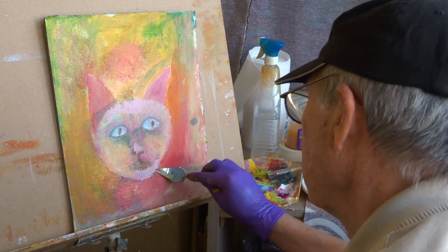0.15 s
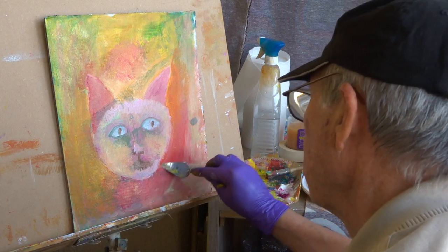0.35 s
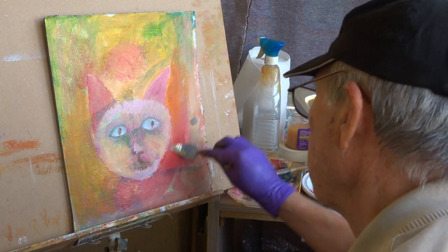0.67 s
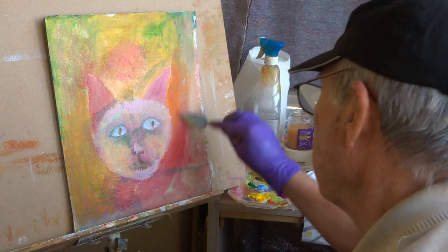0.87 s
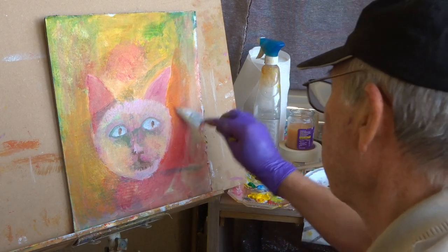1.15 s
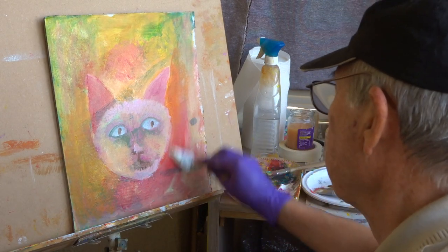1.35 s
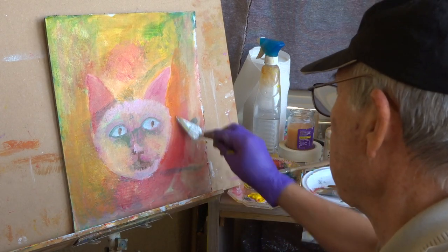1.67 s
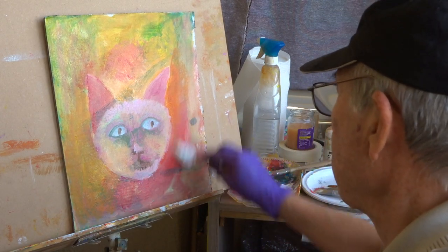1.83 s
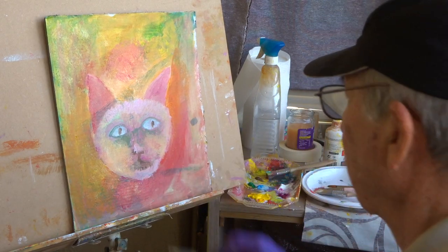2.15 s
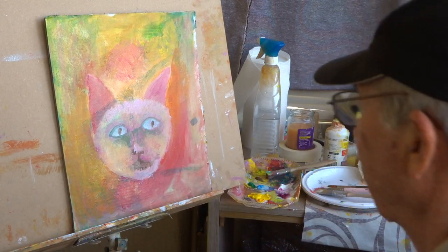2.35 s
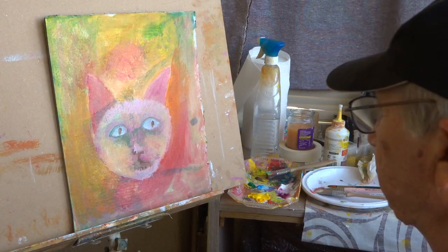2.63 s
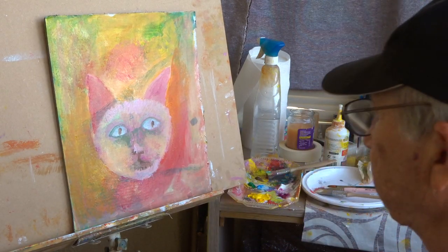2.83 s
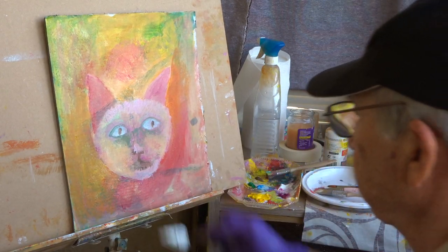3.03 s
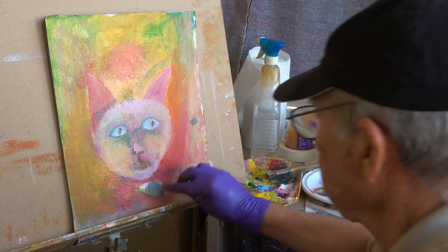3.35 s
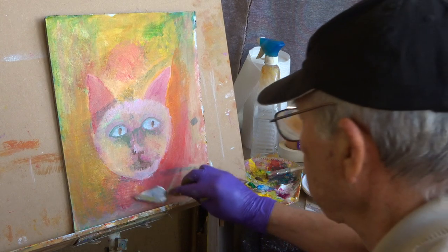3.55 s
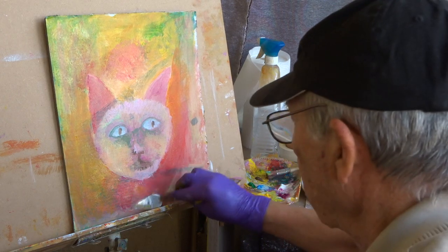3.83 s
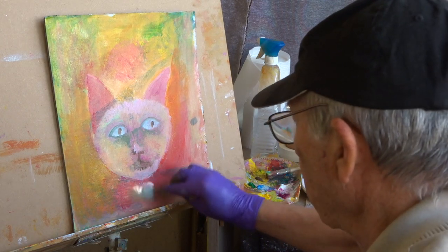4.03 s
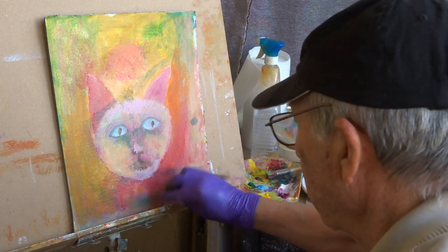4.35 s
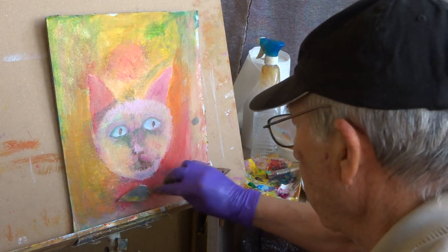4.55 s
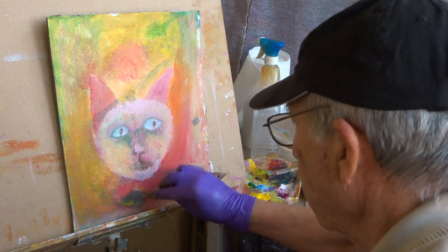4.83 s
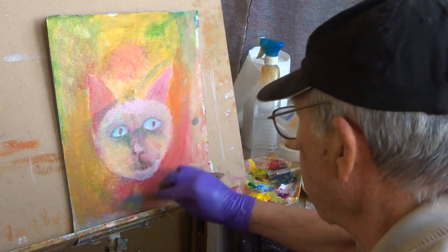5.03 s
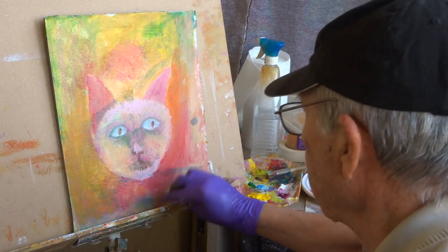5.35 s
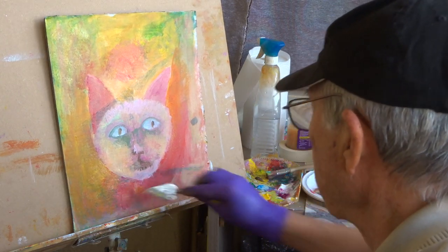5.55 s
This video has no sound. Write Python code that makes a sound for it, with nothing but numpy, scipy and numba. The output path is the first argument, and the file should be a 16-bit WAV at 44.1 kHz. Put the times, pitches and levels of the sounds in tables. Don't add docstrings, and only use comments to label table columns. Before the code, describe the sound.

A thin steel painting knife works on a board close to a stereo microphone in a small furnished room. Faint smears come first, then two louder rasping strokes with springy metallic ring, a near-quiet pause with tiny sticky ticks, and finally an irregular run of light scrapes and increasingly sharp taps. A soft fan hum continues underneath.

```python
import sys
import numpy as np
from scipy import signal
from scipy.fft import rfft, irfft, next_fast_len
from scipy.io import wavfile
from numba import njit

SR = 44100
rng = np.random.default_rng(int(sys.argv[2]) if len(sys.argv) > 2 else 0)


def boost_factor(decibels):
    exponent = np.asarray(decibels, float) / 20
    return 10 ** exponent


def unload_audio(sound):
    columns = np.transpose(np.atleast_2d(sound))
    steps = np.round(np.clip(columns, -1, 1) * 32767)
    wavfile.write(sys.argv[1], SR, steps.astype(np.int16))


N = 250929

# (frequency [Hz], density [dB per Hz])
HUM_MID = [(25, -31), (75, -31), (110, -18), (185, -14), (225, -5), (520, -4.5), (800, 2), (1130, -0.5),
           (1300, -8.5), (1550, -11.5), (2500, -16.5), (3500, -19), (3900, -23.5), (11500, -29.5)]
# (frequency [Hz], density [dB per Hz])
HUM_SIDE = [(15, -84.5), (25, -58), (216, -28), (279, -21.5), (420, -22), (466, -13.5), (543, -23),
            (907, -4.5), (1370, -20.5), (1860, -22.5), (2010, -24), (2400, -25.5), (4570, -35),
            (10600, -43.5), (11500, -44), (15000, -86), (22000, -120)]
# (frequency [Hz], width [Hz], level [dB], not used)
HUM_PEAKS = [(584, 114, -3), (1046, 206, 0)]

# (time [s], upper modes [dB], second mode [Hz])
SMEARS = [
    [(.3, -79, 1960), (.39, -55, 2020), (.43, -55, 1980), (.47, -62.5, 1990), (.51, -77, 2000)],
    [(.55, -59.5, 1990), (.64, -53.5, 2060), (.67, -59, 2010), (.72, -49.5, 2030), (.745, -43.5, 1990),
     (.8, -43, 1990), (.84, -55.5, 1900), (.905, -42.5, 1973), (.96, -81, 1980)],
]
# (time [s], upper modes [dB], second mode [Hz])
STROKES = [
    [(1.235, -52, 2000), (1.275, -59, 1980), (1.296, -47.5, 2166), (1.319, -36.5, 2140),
     (1.38, -34.5, 2050), (1.4, -28, 1990), (1.421, -23.5, 2030), (1.44, -52, 2030), (1.5, -50, 2050)],
    [(1.8, -50.5, 1990), (1.832, -45.5, 2160), (1.85, -29, 2090), (1.872, -23.5, 2055), (1.935, -22, 1990),
     (1.948, -49, 1900), (1.99, -63, 1830), (2.065, -58, 1950), (2.12, -60, 1950)],
]
# (level at FIRM_DB [dB], change with level [dB per dB], change with bend [dB per 100 Hz])
SMEAR_MIX = [(-5.5, -0.19, -2.5), (-9, -0.33, 0), (2.5, 0.46, -4.1)]
STROKE_MIX = [(-1, -0.033, 3.3), (-12, -0.28, 11.8), (-0.5, -0.12, 4.6)]
FIRM_DB = -35.5
REST_HZ = 2020
# (frequency [Hz], width [Hz], level [dB])
BLADE_LIGHT = [(1178, 23, 0), (1513, 34, -19), (1990, 59, -3), (2670, 41, -16), (3200, 46, 6.5),
               (3600, 64, -15), (4130, 82, -6.5), (4210, 140, -9), (5080, 78, -12), (5130, 140, -18),
               (6100, 88, -15), (7570, 110, -11.5)]
# (frequency [Hz], width [Hz], level [dB])
BLADE_FLAT = [(1225, 95, 0), (1457.4, 137, -9.5), (1950, 142, 2), (2030, 118, 5), (2250, 65, -13),
              (2740, 47, -5), (3000, 61, 0), (3224, 62, 4.5), (3210, 48, -18), (4070, 57, -32),
              (4320, 92, -5.5), (4550, 140, -9), (6000, 190, -20), (6800, 68, -36)]
# (frequency [Hz], width [Hz], level [dB])
BLADE_EDGE = [(1130, 22, 0), (1930, 165, 0.5), (2330, 41, -2), (2786, 260, 13), (3170, 24, 22.5),
              (3400, 170, 11.5), (4600, 28, -1), (4720, 48, 8.5), (6300, 20, -73), (6600, 120, -21)]
# (frequency [Hz], density [dB per Hz])
GRIT = [(300, -49), (700, -92), (1300, -10), (2500, -3), (3700, -9.5), (6000, -4), (8000, -9),
        (10500, -13.5), (13000, 4)]

# (frequency [Hz], T60 [s])
ROOM_T60 = [(300, 0.62), (1000, 0.23), (3000, 0.26), (7000, 0.27), (11000, 0.25)]
# (frequency [Hz], side over mid [dB])
ROOM_SIDE = [(300, -10), (900, -7), (2500, -12), (6000, -9), (11000, -8.5)]
# (delay [s], level [dB])
ECHOES = [(.0046, -1), (.0066, -11.5), (.0092, -30)]

# (time [s], peak [dB], upper modes over peak [dB])
LANDINGS = [
    (0.4163, -61, -1),
    (1.215, -38, -21),
    (1.737, -37, -12.5),
    (1.8017, -44.5, -12),
]
# (frequency [Hz], level [dB], T60 [s])
BLADE_FREE = [(1122, 2.5, 0.11), (1880, -1.5, 0.067), (1876, 7, 0.034), (3200, -1.5, 0.053),
              (3390, -28, .05), (4090, -5, 0.037), (5370, -22, 0.041), (6200, -12, .05), (6870, -5, .04),
              (7730, -24, .04)]
# (time [s], peak [dB], blade ring [Hz], crack over peak [dB])
TICKS = [(0.416, -45.5, 4210, 6.5), (1.368, -26, 4600, -12), (1.7362, -35, 3000, -7),
         (2.069, -46.5, 4630, -4), (2.3865, -53, 4150, 8), (2.4253, -41, 3630, -4),
         (2.437, -40.5, 3720, -2.5), (2.8099, -48.5, 3160, -10), (3.6652, -45.5, 3280, -8),
         (3.8234, -40.5, 3550, 2.5), (4.148, -37.5, 4000, 2), (4.3778, -53, 3260, 3.5),
         (4.675, -37.5, 3600, -8), (4.9401, -33, 3800, -3.5), (5.053, -40.5, 4560, -17),
         (5.405, -38.5, 4750, -14), (5.4717, -44.5, 3310, 3.5)]
# (time [s], peak [dB], blade ring [Hz], board knock [Hz], knock over peak [dB])
TAPS = [(0.8375, -33.5, 4260, 1820, -4.5), (1.242, -35, 3160, 1880, -8.5), (1.2482, -56, 2500, 2480, -1),
        (3.3729, -46, 3530, 1220, -9), (3.578, -39, 3120, 2350, -18), (3.695, -44, 2840, 1250, -7),
        (3.879, -32, 4600, 2270, -5.5), (3.8856, -28, 3130, 2540, -17), (4.012, -35.5, 2970, 1930, -35),
        (4.4295, -25.5, 4000, 1240, -6.5), (4.64, -34.5, 3240, 1950, -33), (4.718, -19, 3400, 2230, -7.5),
        (4.9585, -19.5, 3310, 2400, -15), (5.1656, -29.5, 3200, 1930, -31), (5.212, -26.5, 3360, 1670, -6),
        (5.419, -20.5, 3170, 1800, -5.5), (5.4874, -29, 3370, 1850, -13)]
# (firmest contact [s], slide-in [s], ring [dB], dry hiss over ring [dB])
DABS = [(2.31, .02, -68, 17), (2.39, 0.065, -65.5, 17), (2.43, .03, -69, -1), (2.5, .05, -66, 16),
        (2.815, .01, -58.5, 9.5), (3.41, 0.061, -55, -36), (3.46, 0.032, -49, 7), (3.51, .06, -55, -3),
        (3.6, 0.093, -61, 8), (3.68, 0.037, -55.5, -16), (3.79, 0.027, -51, 4), (3.86, 0.064, -43.5, -1),
        (3.9, .02, -59, -2.5), (4.035, .015, -56, -11), (4.13, 0.22, -54, 4), (4.17, .02, -51.5, -14),
        (4.416, 0.069, -49, 6.5), (4.45, .02, -43.5, -14), (4.51, .01, -44.5, 0), (4.66, 0.023, -51, 1),
        (4.707, 0.072, -46.5, 3), (4.75, .02, -44.5, -8), (4.828, 0.025, -44.5, 1),
        (4.952, 0.038, -38.5, 4.5), (4.99, 0.018, -54, -17), (5.06, 0.037, -51, 5), (5.192, .02, -38, 0),
        (5.24, .02, -52, -15), (5.3, 0.031, -46, -4), (5.495, 0.026, -57, -3)]


def rms_one(x):
    return x / np.sqrt(np.mean(x ** 2) + 1e-20)


def at_hz(points, hz):
    table_hz, values = np.array(points)[:, 0], np.array(points)[:, 1]
    return np.interp(np.log(np.maximum(hz, 1)), np.log(table_hz), values)


def colour(x, spectrum):
    size = next_fast_len(N)
    gain = boost_factor(at_hz(spectrum, np.fft.rfftfreq(size, 1 / SR)))
    return rms_one(irfft(rfft(x, size) * gain, size)[:N])


def band(x, low_hz, high_hz):
    return signal.sosfilt(signal.butter(2, [low_hz, high_hz], "band", fs=SR, output="sos"), x)


def band_one(x, low_hz, high_hz):
    return x / np.sqrt(np.mean(band(x, low_hz, high_hz) ** 2))


def drift(rate_hz):
    r = np.exp(-2 * np.pi * rate_hz / SR)
    slow = signal.lfilter([1], [1, -2 * r, r * r], rng.standard_normal(N + SR))
    return rms_one(slow[SR:])


@njit
def ring(force, turn, bend, r):
    out, state = np.zeros(len(force)), 0j
    for i in range(len(force)):
        state = state * r * np.exp(1j * turn * bend[i]) + force[i]
        out[i] = state.imag
    return out


def resonate(force, modes, bend, widen, wander_db):
    rows = []
    for k, (hz, width_hz, level_db) in enumerate(modes):
        r = np.exp(-np.pi * width_hz * widen / SR)
        strength = boost_factor(level_db + wander_db * drift(13.8))
        drive = force * strength * (1 - r) * (-1) ** k
        shift = bend if hz < 2500 else np.sqrt(bend)
        rows.append(ring(drive, 2 * np.pi * hz / SR, shift, r))
    return np.array(rows)


def fan_hum():
    mid_db, side_db = -51.5, -54
    mid = colour(rng.standard_normal(N), HUM_MID)
    side = colour(rng.standard_normal(N), HUM_SIDE)
    peaks = [(hz, width_hz, 0) for hz, width_hz, _ in HUM_PEAKS]
    mid = rms_one(mid + 1.2 * sum(resonate(mid, peaks, np.ones(N), widen=1.0, wander_db=0)))
    side = boost_factor(side_db) * side - 0.65 * boost_factor(mid_db) * band(mid, 770, 1900)
    mid = boost_factor(mid_db) * mid
    return boost_factor(0.048 * drift(21)) * np.array([mid + side, mid - side])


def contact(tables, mix):
    rows = []
    for table in tables:
        before = (table[0][0] - .006, -95, table[0][2])
        after = (table[-1][0] + .006, -95, table[-1][2])
        rows += [before, *table, after]
    s, *columns = np.transpose(rows)
    level_db, hz = [np.interp(np.arange(N) / SR, s, c) for c in columns]
    firmness_db, bend = level_db - FIRM_DB, (hz - REST_HZ) / 100
    over_db = [base + per_db * firmness_db + per_bend * bend for base, per_db, per_bend in mix]
    return level_db, *over_db, hz


def grit_clicks(per_s, spread_db, lumpy_db):
    sizes = boost_factor(spread_db * np.minimum(rng.exponential(1, N), 5)) * rng.choice([-1, 1], N)
    hits = rng.random(N) < per_s / SR
    return rms_one(sizes * hits * boost_factor(lumpy_db * drift(81)))


def scrape(upper_db, hiss_db, first_db, second_db, modes, bend, per_s, widen, ring_trim_db, hiss_trim_db):
    clicks = grit_clicks(per_s, spread_db=1.5, lumpy_db=2.7)
    rows = resonate(clicks, modes, bend, widen, wander_db=4.0)
    hz = np.array(modes)[:, 0]
    first = rms_one(rows[0])
    second = rms_one(sum(rows[(hz > 1450) & (hz < 2500)]))
    upper = band_one(sum(rows[hz > 2500]), 2600, 4500)
    rung = upper + boost_factor(first_db) * first + boost_factor(second_db) * second
    hiss = band_one(colour(clicks, GRIT), 5000, 11000)
    return boost_factor(upper_db + ring_trim_db) * rung + boost_factor(upper_db + hiss_db + hiss_trim_db) * hiss


def room(x, wet_db):
    t = np.arange(SR // 2) / SR
    tail, edges = 0, 200 * 2 ** np.arange(0, 6.1, .5)
    for low, high in zip(edges, edges[1:]):
        hz = np.sqrt(low * high)
        decay = boost_factor(-60 * t / at_hz(ROOM_T60, hz))
        spread = boost_factor([[0], [at_hz(ROOM_SIDE, hz)]])
        tail = tail + band(rng.standard_normal((2, len(t))), low, high) * decay * spread
    tail *= 1 - np.exp(-(t / 0.0011) ** 2)
    mid, side = tail / np.sqrt(np.sum(tail[0] ** 2)) * boost_factor(wet_db)
    mid[0] = 1
    for lag, level_db in ECHOES:
        mid[round(lag * SR)] += boost_factor(level_db)
    return np.array([signal.fftconvolve(x, h)[:N] for h in (mid + side, mid - side)])


def landings():
    out, at = np.zeros(N), [round(row[0] * SR) for row in LANDINGS]
    _, peak_db, upper_db = np.transpose(LANDINGS)
    for hz, level_db, t60 in BLADE_FREE:
        force = np.zeros(N)
        balance_db = (hz > 2500) * (upper_db + 15.5)
        force[at] = boost_factor(peak_db + level_db - 10.5 + balance_db + rng.normal(0, 0.9, len(at)))
        force = signal.lfilter([.3], [1, -.7], force + 1e-18) * 1.62
        out += ring(force, 2 * np.pi * hz / SR, np.ones(N), boost_factor(-60 / (t60 * SR)))
    return out


def ticks_and_taps():
    tap_crack_db, tick_knock_hz, tick_knock_db = -20.5, 2050, -16.5
    out, t = np.zeros(N), np.arange(1600) / SR
    touches = [(*row, tap_crack_db) for row in TAPS]
    touches += [(s, db, hz, tick_knock_hz, tick_knock_db, crack_db) for s, db, hz, crack_db in TICKS]
    rise = 1 - np.exp(-t / 0.00012)
    thud = 0.55 * np.sin(2 * np.pi * 820 * t) * rise * np.exp(-t / 0.0003)
    for s, peak_db, ring_hz, knock_hz, knock_db, crack_db in touches:
        noise, grains = rng.standard_normal((2, len(t)))
        tone = 1.19 * np.sin(2 * np.pi * ring_hz * t) * rise * np.exp(-t / 0.0009)
        knock = np.sin(2 * np.pi * knock_hz * t) * rise * np.exp(-t / 0.00096)
        crack = band((t == 0) * 5.7 + noise * np.exp(-t / 0.00026), 4500, 16500)
        skid = 0.2 * band(grains ** 3, 450, 4920) * rise * np.exp(-t / 0.0036)
        touch = tone + skid + boost_factor(knock_db + 7.0) * (thud - knock) + boost_factor(crack_db + 4.5) * crack
        at = round((s + .001) * SR)
        out[at:at + len(t)] += boost_factor(peak_db) * touch[:N - at]
    return out


def squeak():
    start_s, end_s, start_hz, end_hz, width_hz, level_db = .84, 0.97, 4000, 3400, 120, -56
    way = np.clip((np.arange(N) / SR - start_s) / (end_s - start_s), 0, 1)
    hz = start_hz + way * (end_hz - start_hz)
    clicks = grit_clicks(5000, spread_db=4.0, lumpy_db=1.0)
    tone = ring(clicks, 2 * np.pi / SR, hz, np.exp(-np.pi * width_hz / SR))
    return boost_factor(level_db) * rms_one(tone) * np.sqrt(np.abs(np.sin(np.pi * way)))


def dabs():
    slide_in_db, lift_db_per_s = 19, 291
    t, rung, hiss = np.arange(0, N + 32, 32) / SR, 1e-12, 1e-12
    for s, slide_s, ring_db, hiss_db in DABS:
        swell_db = slide_in_db * (s - t) / max(slide_s, .003)
        fade_db = lift_db_per_s * (t - s)
        power = boost_factor(ring_db - np.maximum(swell_db, fade_db)) ** 2
        rung = rung + power
        hiss = hiss + power * boost_factor(hiss_db) ** 2
    return [np.interp(np.arange(N) / SR, t, 10 * np.log10(p)) for p in (rung, hiss / rung)]


def scene():
    *light_db, light_hz = contact(SMEARS, SMEAR_MIX)
    *stroke_db, stroke_hz = contact(STROKES, STROKE_MIX)
    ring_db, hiss_db = dabs()
    knife = scrape(*light_db, BLADE_LIGHT, np.sqrt(light_hz / REST_HZ), per_s=7000, widen=0.87,
                   ring_trim_db=-6.0, hiss_trim_db=-6.5)
    knife += scrape(*stroke_db, BLADE_FLAT, stroke_hz / REST_HZ, per_s=9000, widen=1.0,
                    ring_trim_db=-7, hiss_trim_db=-7)
    knife += scrape(ring_db, hiss_db, -11.0, 0.094, BLADE_EDGE, np.ones(N), per_s=4000, widen=1.9,
                    ring_trim_db=-11, hiss_trim_db=-15.5)
    knife += landings() + ticks_and_taps()
    knife = band(knife, 450, 16800)
    pan_db = boost_factor([[.15], [-.15]])
    return room(knife, wet_db=2.5) * pan_db + fan_hum() + squeak()


def low_pass(x):
    return signal.sosfilt(signal.butter(12, 12330, fs=SR, output="sos"), x)


def record(dry):
    cut = signal.sosfilt(signal.ellip(10, .3, 41, 10990, fs=SR, output="sos"), dry)
    cut = signal.sosfilt(signal.cheby2(10, 50, 12400, fs=SR, output="sos"), cut)
    return low_pass(cut)


dry = scene()
out = record(dry)
unload_audio(out)
```